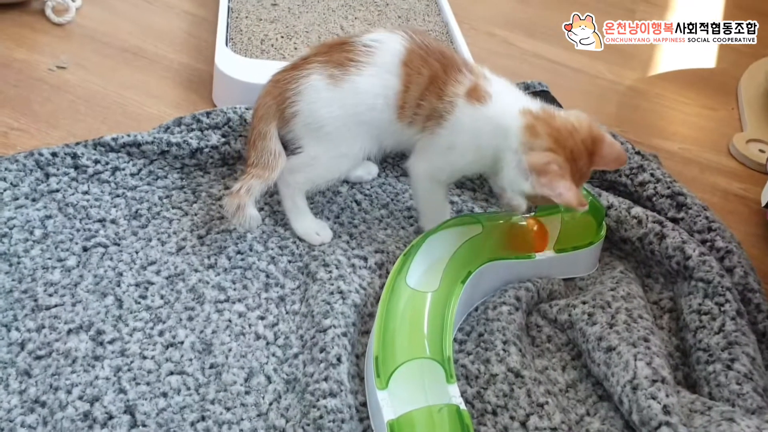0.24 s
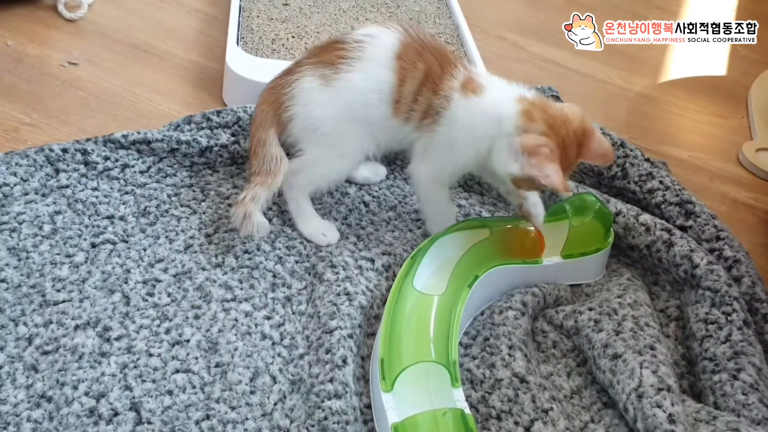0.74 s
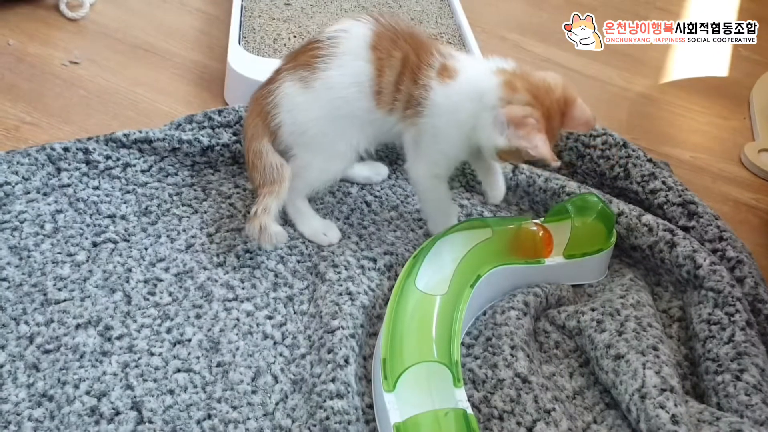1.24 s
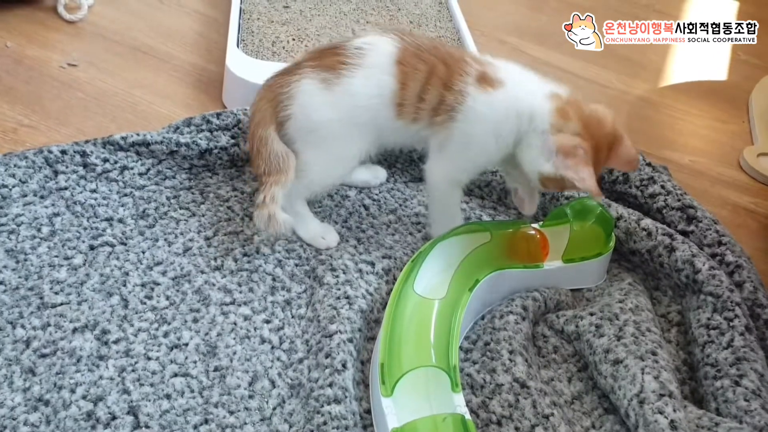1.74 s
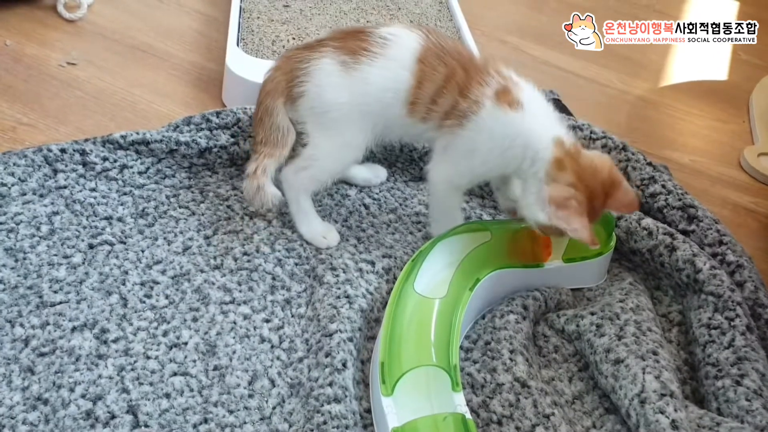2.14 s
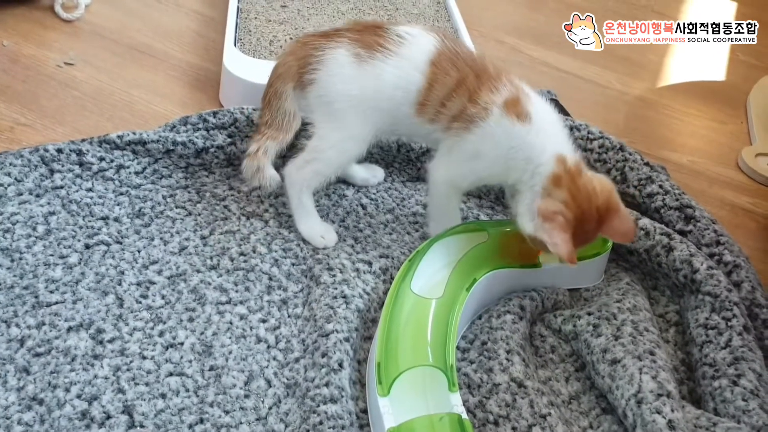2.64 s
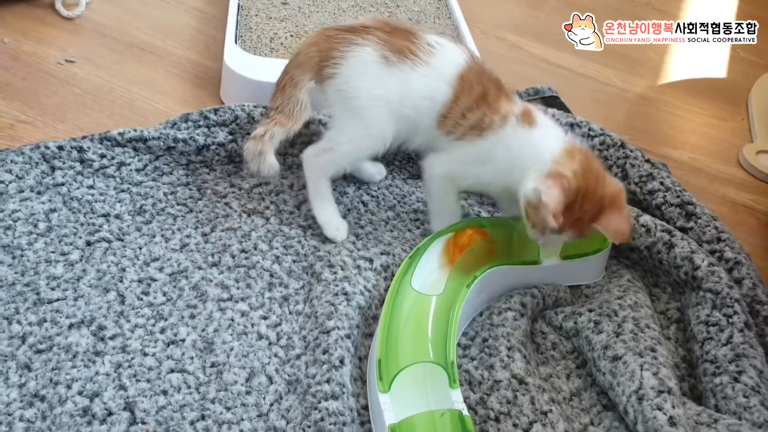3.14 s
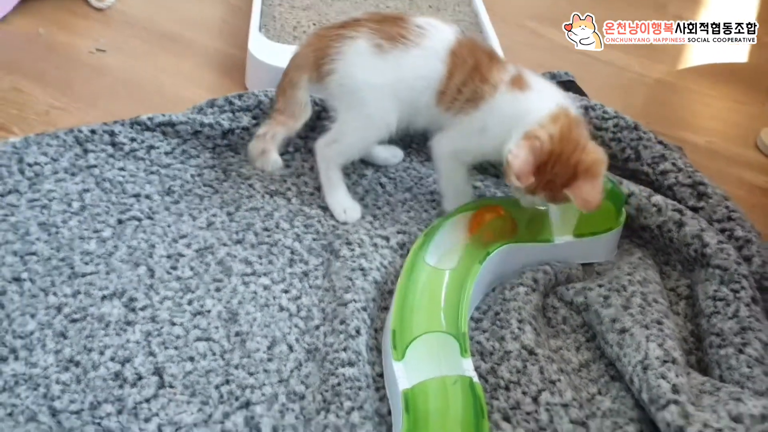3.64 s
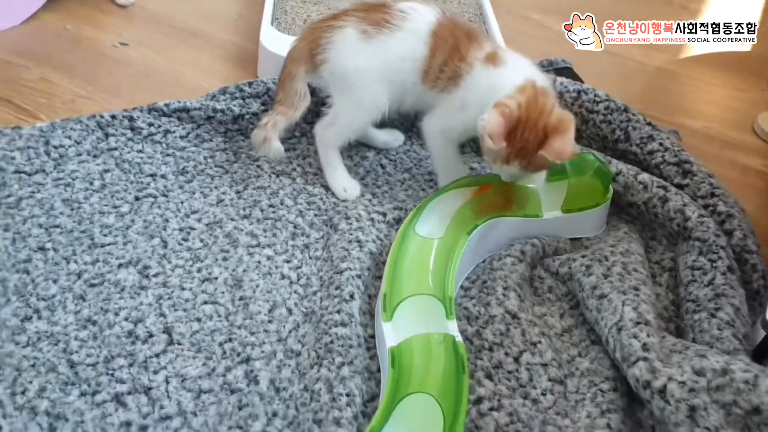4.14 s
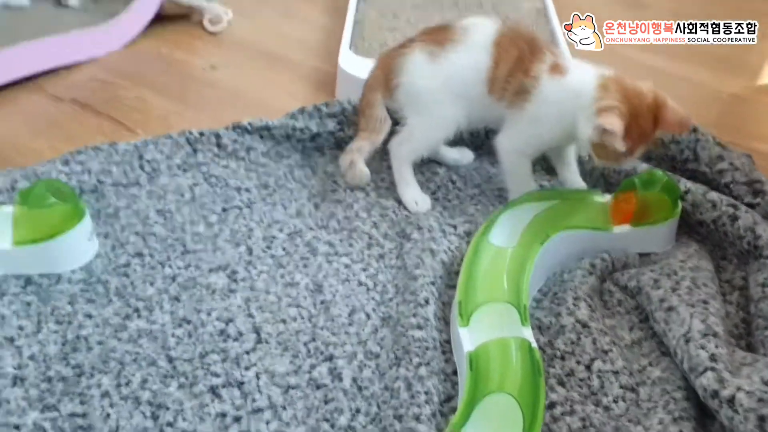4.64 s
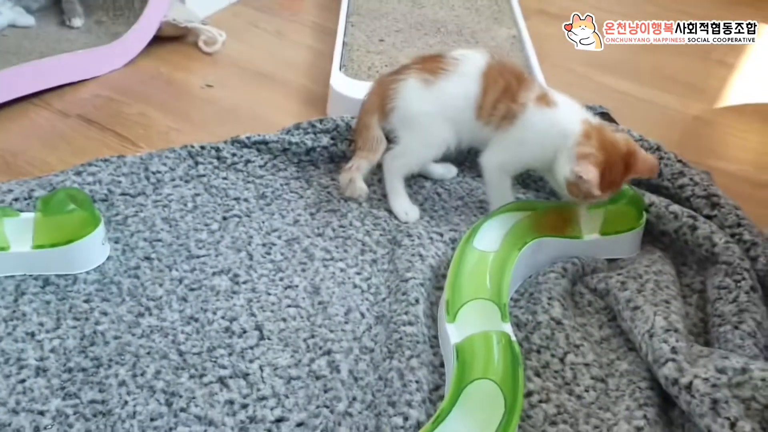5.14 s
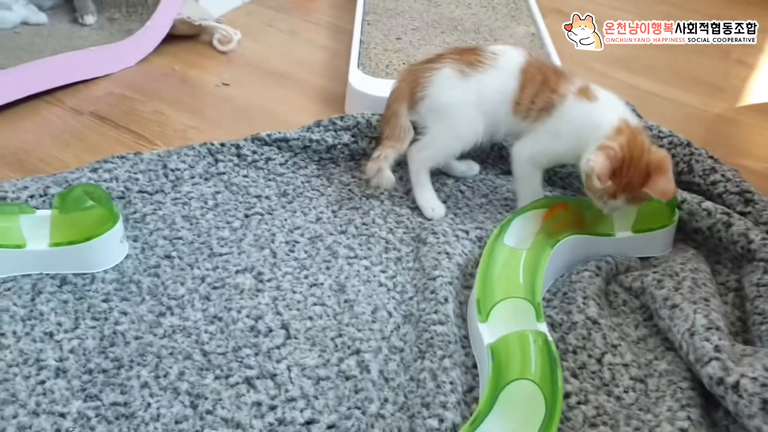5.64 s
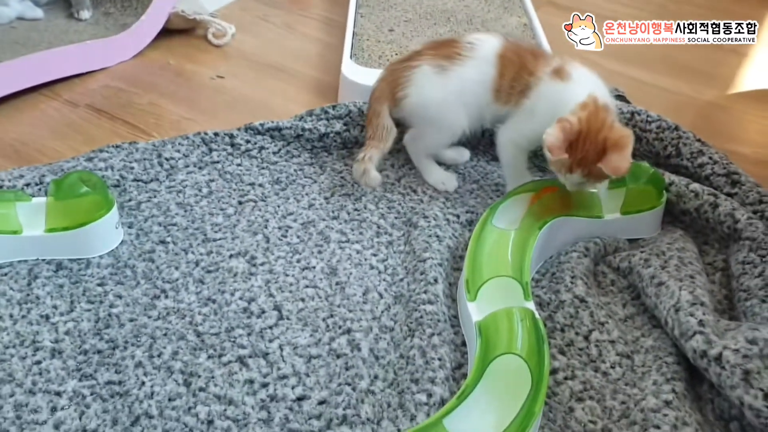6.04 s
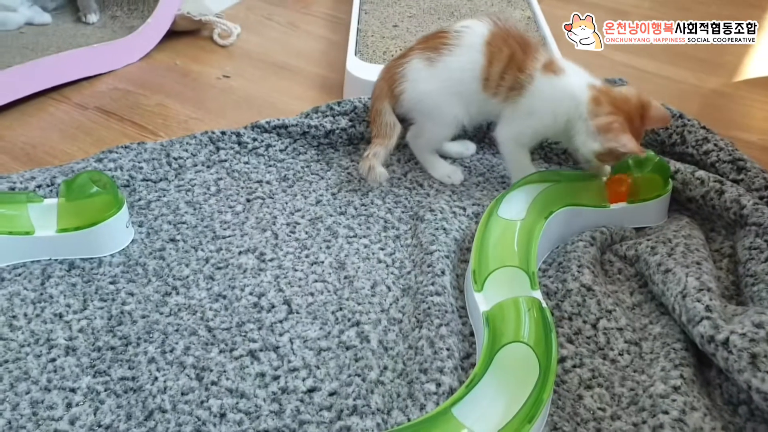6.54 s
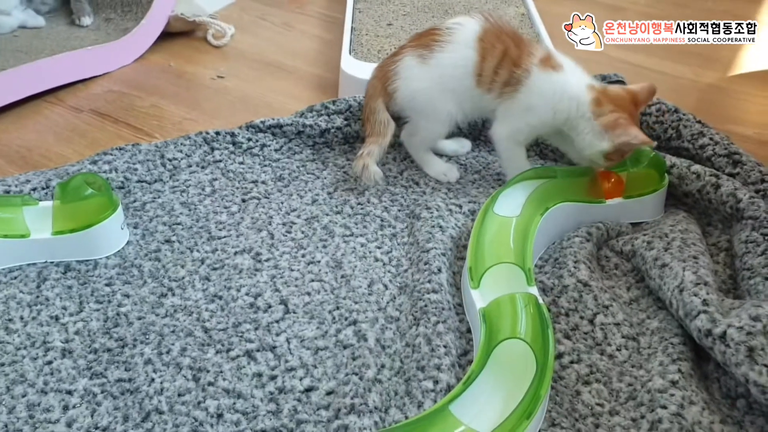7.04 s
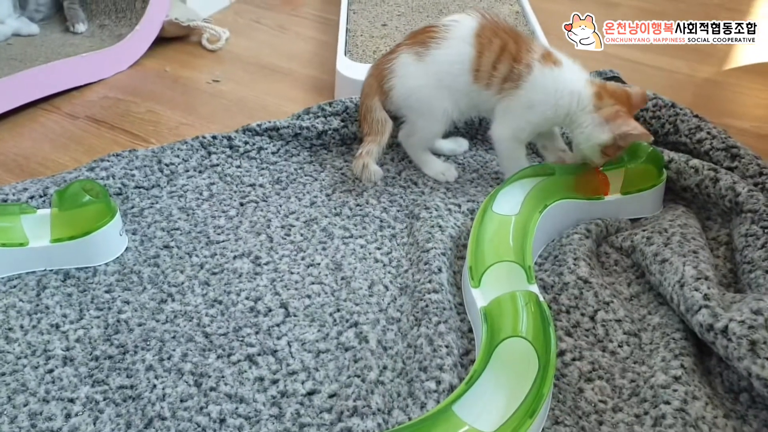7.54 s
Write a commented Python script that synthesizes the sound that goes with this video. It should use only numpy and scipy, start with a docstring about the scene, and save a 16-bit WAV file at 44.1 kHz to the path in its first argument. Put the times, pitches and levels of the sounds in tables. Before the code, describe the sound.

A kitten paws a ball in a hollow plastic track: hollow knocks, rattly rolling and claw ticks, with rubbing and bumps from the hand-held microphone.

```python
"""Kitten with a ball in a toy track

A kitten paws at a ball in a hollow plastic track in a quiet room: noise-like contact forces excite
the track's resonances as knocks, wall taps, rolling, claw ticks, scuffs and scrapes, with a reverberant tail.
Fingers on the hand-held recorder add rubbing (shaped noise), clicks and thumps (decaying pulses and tones),
and a bump on the right microphone (a damped pressure swing).
Filtered noise gives a low room rumble and an airy hiss, and wavering sines give a drone and a faint hum."""
import sys
import numpy as np
from scipy import signal
from scipy.fft import rfft, irfft
from scipy.io import wavfile
from scipy.ndimage import uniform_filter1d

SR = 44100
rng = np.random.default_rng(int(sys.argv[2]) if len(sys.argv) > 2 else 0)


def unload_audio(sound):
    """Save the sound as a 16-bit wav file, at the path given as the first command line argument."""
    columns = np.transpose(np.atleast_2d(sound))
    # keep every value between -1 and 1, then stretch to whole-number steps
    steps = np.round(np.clip(columns, -1, 1) * 32767)
    wavfile.write(sys.argv[1], SR, steps.astype(np.int16))


N = 343980
TIME = np.arange(N) / SR


def from_db(db):
    """Amplitude ratio from decibels, twenty per factor of ten."""
    return 10 ** (np.asarray(db) / 20)


def rms_one(x):
    """Normalise the mean power to one."""
    return x / np.sqrt(np.mean(x ** 2) + 1e-20)


def level(curve, column=1):
    """Amplitude envelope interpolated linearly in decibels, silent outside its span."""
    points = np.array(curve)
    return from_db(np.interp(TIME, points[:, 0], points[:, column], left=-200, right=-200))


def panned(db):
    """Stereo placement by interaural level difference: left and right gains."""
    difference = np.atleast_1d(db)
    return from_db(np.array([difference, -difference]) / 2)


def add(out, s, sound):
    """Linear superposition of a sound starting at s seconds."""
    i = max(int(s * SR), 0)
    out[..., i:i + sound.shape[-1]] += sound[..., :N - i]


def band(x, low_hz, high_hz, order=2):
    """Causal Butterworth band-pass filtering."""
    edges = [low_hz, min(high_hz, SR / 2 - 1000)]
    return signal.sosfilt(signal.butter(order, edges, "band", fs=SR, output="sos"), x)


def coloured(x, spectrum):
    """Spectral shaping: gains interpolated over log frequency; rms 1."""
    hz, db = np.transpose(spectrum)
    log_hz = np.log(np.fft.rfftfreq(x.shape[-1], 1 / SR) + 1)
    gain = from_db(np.interp(log_hz, np.log(hz), db, left=-90))
    return rms_one(irfft(rfft(x) * gain, x.shape[-1]))


def stereo_noise(alike, size=N):
    """Partly coherent white noise: a shared power fraction (alike) plus independent remainders."""
    shared = np.sqrt(alike) * rng.standard_normal(size)
    return shared + np.sqrt(1 - alike) * rng.standard_normal((2, size))


def wander(per_s, size=N):
    """Slow random modulation: normal draws joined by straight lines."""
    return np.interp(TIME[:size] * per_s, np.arange(1600), rng.standard_normal(1600))


def random_contacts(per_s, spread_db):
    """Poisson-like impulses whose sizes are exponentially distributed in decibels, capped at three spreads."""
    return (rng.random(N) < per_s / SR) * from_db(spread_db * np.minimum(rng.exponential(1, N), 3))


def grains(per_s, spread_db, hiss):
    """Asperity friction: random tiny contacts of uneven size over a smooth noise."""
    return rms_one(random_contacts(per_s, spread_db) * stereo_noise(0.095)) + hiss * stereo_noise(0.1)


def evened(x, window_s=0.062):
    """Short-time power normalisation: holds the rms near 1, leaving the fast grain."""
    power = uniform_filter1d(np.mean(x ** 2, axis=0), int(window_s * SR))
    return x / np.sqrt(np.maximum(power, 1e-20))


def strokes(rows, attack_s, release_db_per_s, swell_db=14):
    """Incoherent power addition of movements (start, length, dB) that swell, hold and decay exponentially."""
    power, t = 0, TIME[::40]
    for s, length, db in rows:
        swell = swell_db * np.maximum(1 - (t - s) / attack_s, 0)
        release = release_db_per_s * np.maximum(t - s - length, 0)
        power = power + from_db(np.maximum(db - swell - release, -200)) ** 2
    return np.interp(TIME, t, np.sqrt(power))


def stereo_strokes(rows, attack_s, release_db_per_s):
    """Stroke envelopes split by level difference; rows are (start, length, dB, left-right dB)."""
    return np.array([strokes([(s, length, db + side * pan / 2) for s, length, db, pan in rows],
                             attack_s, release_db_per_s) for side in (1, -1)])


def resonance(x, hz, width_hz):
    """One damped mode as a two-pole resonator, gain about 1 at its peak."""
    r, w = np.exp(-np.pi * width_hz / SR), 2 * np.pi * hz / SR
    return signal.lfilter(np.array([1, 0, -1]) * (1 - r * r) / 2, [1, -2 * r * np.cos(w), r * r], x)


def track(force, low_hz, high_hz, flex=0, shell_db=-15, coupling_db=4):
    """Modal synthesis: the plastic's modes, coupled unevenly as the contact moves, over a broad shell response."""
    # resonances of the plastic track, before coupling and flex: pitch_hz, width_hz, level_db
    track_modes = [(345, 220, -1), (458, 70, -9), (624, 55, -4.5), (729, 37, 2.5), (816.6, 26, 5),
                   (887, 7.1, -10.5), (961, 12.4, -7.5), (1380, 140, -18.5), (1550, 140, -10),
                   (2026, 190, -2), (2342, 105, 7), (2460, 70, -4.5), (2250, 140, -3.5), (2717, 40, -14),
                   (3356, 37, -7.5), (4300, 71, -1), (6570, 130, 1.5), (7090, 270, -1), (7190, 290, -8.5),
                   (8030, 74, -2), (8380, 97, -2.5), (10140, 74, 3), (11630, 170, 0), (12140, 720, -27)]
    out = from_db(shell_db) * force
    for hz, width, db in track_modes:
        if low_hz < hz < high_hz:
            coupling = coupling_db * wander(per_s=45, size=force.shape[-1])
            out = out + resonance(force * from_db(db + coupling), hz * (1 + flex * rng.normal()), width)
    return band(out, low_hz, high_hz, order=3)


def travelling(ring, glide):
    """Time-warp pitch shift: resonances glide a little as the contact moves along the track; rms near 1."""
    travel = TIME + np.cumsum(glide * wander(per_s=14)) / SR
    return evened(np.array([np.interp(travel % TIME[-1], TIME, side) for side in ring]))


def blow(low_hz, high_hz, contact_s, alike, buzz_db=-18, buzz_s=0.011, flex=0.021, rough=1.0):
    """Impact excitation: a rough contact and a buzz of the loose cover; each mode is detuned slightly at random."""
    t = TIME[:SR // 14]
    contact = (t / contact_s * np.exp(1 - t / contact_s)) ** 2
    buzz = from_db(buzz_db) * np.exp(-t / buzz_s) * (1 - np.exp(-t / contact_s))
    force = rough * stereo_noise(alike, size=len(t)) * (contact + buzz)
    if low_hz < 1000:   # the ball's mass drives the hollow in one push
        push = signal.unit_impulse(len(t), int(contact_s * SR))
        force = force + push * np.sqrt(np.sum(contact ** 2))
    ring = track(force, low_hz, high_hz, flex=flex)
    return ring / ring[:, :SR // 80].std()   # rms 1 over its start


def background(rumble_pan_db=-3, drone_hz=69, hum_hz=249):
    """Shaped noise of slowly changing level for rumble and hiss, phase-modulated sines for a drone and a late hum."""
    # noise levels of the room before panning: time_s, air_db, rumble_db
    room_levels = [(0, -62, -53), (1.1, -56, -48), (2.4, -56.5, -50.5), (3.3, -57.5, -44.5),
                   (4.5, -53, -43.5), (5.5, -57.5, -48.5), (6.3, -56, -47), (7.0, -61.5, -52.5),
                   (7.8, -58.5, -49)]
    # spectrum of the rumble: frequency_hz, relative_level_db
    rumble_colour = [(20, -17.5), (33, -12), (50, 6), (65, 6), (90, -5), (125, -5), (170, -16.5),
                     (260, -20.5), (400, -20), (800, -53)]
    # spectrum of the airy hiss: frequency_hz, relative_level_db
    air_colour = [(150, 15.5), (400, -2.5), (850, 7), (1300, 3), (2000, -5.5), (3000, -21), (5000, -25),
                  (10000, -27), (15500, -25)]
    # rms of the low drone before panning, swelling and fading: time_s, level_db
    drone_levels = [(0, -73), (.3, -48.5), (.8, -44.5), (1.1, -45.5), (1.5, -47.5), (2.1, -65)]
    # amplitude of the hum before panning: time_s, level_db
    hum_levels = [(4.6, -51.5), (5.0, -62), (5.4, -55.5), (5.9, -64.5), (6.6, -59.5), (7.1, -76.5),
                  (7.8, -60.5)]
    rumble = level(room_levels, column=2) * coloured(stereo_noise(0.88), rumble_colour)
    air = level(room_levels) * coloured(stereo_noise(0.14), air_colour)
    waver = coloured(rng.standard_normal(N), [(1.5, 12.0), (6, -11.5), (25, -63.0), (100, -120)])   # phase, rad
    drone = np.sqrt(2) * level(drone_levels) * np.sin(2 * np.pi * drone_hz * TIME + waver)
    hum = level(hum_levels) * np.sin(2 * np.pi * hum_hz * TIME + 0.39 * waver)
    return (rumble + drone + hum) * panned(rumble_pan_db) + air


def thumps(pan_db=-3, shudder_db=-12, attack_s=0.0027):
    """Damped low modes: soft blows ring through the case with an uneven narrow-band shudder."""
    # thumps through the case, levels before panning: start_s, level_db, pitch_hz, t60_s
    thump_rows = [(0.994, -32, 69.4, 1), (3.444, -33, 148.4, 0.077), (4.587, -10.5, 112, 0.057),
                  (4.611, -21, 135, 0.26), (4.626, -28, 108.8, 0.49), (5.887, -26.5, 117, 0.03)]
    out, t = np.zeros(N), TIME[:SR // 2]
    for s, db, hz, t60 in thump_rows:
        shudder = from_db(shudder_db) * rms_one(band(rng.standard_normal(len(t)), hz / 1.73, hz * 1.47))
        envelope = from_db(db - 60 * t / t60) * (1 - np.exp(-t / attack_s))
        add(out, s, envelope * (np.sin(2 * np.pi * hz * t) + shudder))
    return out * panned(pan_db)


def port_bump(swing_hz=68, swing_s=0.013, case_hz=235, case_db=-4, case_s=0.0024, snap_hz=1150, snap_db=-5,
              snap_s=0.0016, crackle_s=0.0063, slide_db=-35, slide_s=0.14):
    """Damped pressure oscillation: a fingertip shuts the right port, the case knocks, skin slides off with a hiss."""
    # fingertip on the right microphone, levels before filtering: start_s, step_db, crackle_db
    bump_rows = [(5.188, -16.5, -13.5), (5.191, -6, -17)]
    # spectrum of the fingertip's crackle and slide: frequency_hz, relative_level_db
    bump_colour = [(200, 10.5), (1200, -2), (3000, -1), (5000, -8.5), (7000, -5), (9000, -13.5),
                   (12500, -4), (15500, -13.5)]
    out, t = np.zeros((2, N)), TIME[:SR // 3]
    for s, step_db, crackle_db in bump_rows:
        swing = np.cos(2 * np.pi * swing_hz * t) * np.exp(-t / swing_s)
        case = from_db(case_db) * np.sin(2 * np.pi * case_hz * t) * np.exp(-t / case_s)
        snap = from_db(snap_db) * np.sin(2 * np.pi * snap_hz * t) * np.exp(-t / snap_s)
        step = from_db(step_db) * band(swing + case + snap, 27, 5500, order=1)
        crackle = coloured(rng.standard_normal(len(t)), bump_colour) * np.exp(-t / crackle_s)
        add(out[1], s, from_db(crackle_db) * crackle - step)
    slide = coloured(rng.standard_normal(len(t)), bump_colour) * np.exp(-(t / slide_s) ** 2)
    add(out[1], bump_rows[-1][0], from_db(slide_db) * band(slide, 1800, 24000, order=1))
    return out


def grip_clicks(thud_hz=190, thud_s=0.0012, creak_db=-19, creak_s=0.0041):
    """Impulse response of the case: a band-limited click, mostly at the left port, with a gritty creak and a thud."""
    # clicks of the case under the grip: start_s, click_peak_db, centre_hz, edge_over_centre, thud_db, right_db
    grip_rows = [(0.998, -46.5, 2520, 1.63, -31, 5), (3.253, -21, 2600, 1.4, -17.5, -30),
                 (3.274, -18, 2700, 1.4, -13.5, -26), (3.3, -10.5, 3620, 2.4, -14, -22),
                 (3.382, -12.5, 1860, 1.56, -9.5, -40), (3.409, -19, 1600, 2, -12.5, -40),
                 (3.645, -19, 3100, 2.55, -41, -30), (4.084, -13, 1830, 1.57, -30, -36),
                 (4.129, -20.5, 2200, 1.53, -47, -30), (4.3943, -13.5, 1960, 1.45, -44, -29),
                 (4.4005, -8, 3120, 2.5, -8.5, -30), (4.618, -13.5, 2580, 1.64, -26, -30),
                 (4.634, -20, 3300, 2.5, -41, -26), (5.495, -23.5, 2600, 1.5, -50, -29)]
    out, t = np.zeros((2, N)), TIME[:SR // 20]
    for s, db, hz, width, thud_db, right_db in grip_rows:
        click = band(signal.unit_impulse(len(t)), hz / width, hz * width, order=4)
        grit = rms_one(band(rng.standard_normal(len(t)), hz / 2.6, hz * 2.0))
        creak = from_db(creak_db) * grit * np.exp(-t / creak_s)
        thud = np.sin(2 * np.pi * thud_hz * t) * np.exp(-t / thud_s)
        sound = from_db(db) * (click / abs(click).max() + creak) + from_db(thud_db) * thud
        add(out, s, sound * from_db([[0], [right_db]]))
    return out


def shifting(x, depth_db):
    """Independent modulation of four adjacent bands, so the colour keeps changing."""
    out, edges_hz = 0, [125, 700, 2000, 5000, 16000]
    for k, (low, high) in enumerate(zip(edges_hz, edges_hz[1:])):
        polarity = (-1) ** k   # neighbouring bands take opposite signs
        out = out + polarity * band(x, low, high) * from_db(depth_db * wander(per_s=60))
    return out


def scratches(per_s=24, spread_db=-0.5, length_s=0.0064):
    """Stick-slip: skin catches and lets go in brief noise swells of varied size in six bands; rms near 1."""
    out, r = 0, np.exp(-1 / (length_s * SR))
    for hz in np.geomspace(1200, 9000, 6):
        starts = random_contacts(per_s, spread_db)
        swell = signal.lfilter([1], [1, -2 * r, r * r], starts + 1e-18)
        out = out + swell * rms_one(band(stereo_noise(0.12), hz / 1.35, hz * 1.5))
    return evened(out, window_s=0.26)


def rubbing(rub_db=-2, catch_db=-0.5, rasp_catch_db=4, flutter_db=0.8, scratch_db=-6):
    """Sliding friction: skin drags over the case with a fine grain, a coarse sticking rasp and small scratches."""
    # finger strokes on the case, levels before rub_db: start_s, length_s, level_db, rasp_share_db, left_right_db
    rub_rows = [(3.245, 0.058, -50.5, -4.5, 12), (3.373, .035, -46, -3, 17), (3.747, 0.2, -51, -15, 4.5),
                (4.042, 0.071, -53, 2, 13), (4.174, 0.095, -46.5, -3.5, 8.5), (4.257, 0.055, -44, -8, 4),
                (4.303, 0.042, -42.5, -7, 4.5), (4.367, 0.022, -35.5, -2.5, 9.5),
                (4.438, 0.029, -41.5, -8, 2.5), (4.475, 0.049, -45, -9, 3), (4.59, 0.027, -40, 0.5, 8.5),
                (4.667, 0.06, -44.5, -0.5, 5.5), (4.718, 0.057, -44, -6, 3),
                (4.786, 0.093, -45.5, -22, 2.5), (4.884, 0.072, -52.5, -10, 4),
                (5.016, 0.18, -53.5, -15, 5), (5.143, 0.17, -49, -7, -11)]
    # filter gains that colour the drag: frequency_hz, gain_db
    rub_colour = [(150, -17), (400, 4), (750, -0.5), (1100, -16.5), (1700, -8), (2450, -4.5), (3300, -11),
                  (5500, -12), (7500, -8.5), (12000, -11), (15500, -28.5)]
    attack_s, release_db_per_s = 0.029, 229
    drag_rows = [(s, length, db, pan) for s, length, db, _, pan in rub_rows]
    rasp_rows = [(s, length, db + share, pan) for s, length, db, share, pan in rub_rows]
    pressure = stereo_strokes(drag_rows, attack_s, release_db_per_s)
    sticking = stereo_strokes(rasp_rows, attack_s, release_db_per_s)
    grain = shifting(grains(per_s=700, spread_db=1.0, hiss=1.7), depth_db=3.0)
    drag = coloured(grain, rub_colour) * from_db(catch_db * wander(per_s=90))
    rasp = band(grains(per_s=350, spread_db=6.0, hiss=0.51), 800, 2400)
    rasp = rasp * from_db(rasp_catch_db * wander(per_s=110))
    skin = pressure * (evened(drag) + from_db(scratch_db) * scratches()) + sticking * evened(rasp)
    return from_db(rub_db + flutter_db * wander(per_s=31)) * skin


def room(x, wet_db=-7, t60_s=0.27, treble_t60_s=0.23):
    """Diffuse reverberation: convolution with decaying noise that loses its treble first."""
    t = TIME[:SR // 2]
    noise = rng.standard_normal((2, len(t))) * (t > .005)   # a gap ahead of the tail
    tail = band(noise, 150, 7500) * from_db(-60 * t / t60_s)
    tail = tail + band(noise, 6900, 24000) * from_db(-60 * t / treble_t60_s)
    tail /= np.sqrt(np.sum(tail ** 2, axis=1, keepdims=True))
    return x + from_db(wet_db) * signal.fftconvolve(x, tail, axes=1)[:, :N]


def scraping(slip_db=6.0, glide=0.044):
    """Stick-slip: the loose cover drags on its base, and uneven dry contacts rattle its middle modes."""
    # drags of the cover against its base: start_s, length_s, level_db, left_right_db
    scrape_rows = [(0.01, 0.099, -66, 3), (.135, .05, -56, -6), (.185, 0.025, -56.5, 2),
                   (.235, 0.037, -60, 2), (.715, 0.089, -61, 2), (.815, 0.086, -71, 3),
                   (2.805, .08, -63.5, 5), (2.9, .035, -52, 3), (3.25, 0.068, -48.5, 6),
                   (3.308, 0.039, -49.5, 4.5), (3.408, 0.03, -42, 10.5), (3.465, 0.039, -50, 6.5),
                   (5.655, 0.021, -69, 2), (5.98, 0.11, -65, 1), (6.17, 0.078, -64, 0),
                   (6.325, 0.026, -51.5, 2), (6.39, 0.07, -65.5, 2.5), (6.49, 0.036, -57, 6.5),
                   (6.56, 0.077, -61, 1)]
    force = grains(per_s=450, spread_db=5.5, hiss=0.57) * from_db(slip_db * wander(per_s=120))
    rattle = travelling(track(force, 2900, 6800, shell_db=-7.5, coupling_db=10.5), glide)
    return stereo_strokes(scrape_rows, attack_s=0.013, release_db_per_s=333) * rattle


def scuffing(scuff_db=-2, pan_db=3, catch_db=2.0, glide=0.02):
    """Friction-driven resonance: fur and claws catch on the cover and excite its high modes."""
    # paw strokes on the cover, levels before scuff_db and panning: start_s, length_s, level_db
    scuff_rows = [(0, 0.025, -53.5), (.15, 0.082, -54), (.675, 0.048, -59.5), (.72, 0.046, -56.5),
                  (.81, 0.2, -68), (2.62, 0.015, -57.5), (2.8, 0.09, -54.5), (2.88, 0.014, -43.5),
                  (3.02, 0.021, -56), (3.16, 0.11, -61), (3.255, 0.17, -48), (3.405, 0.032, -37.5),
                  (3.66, 0.019, -52.5), (5.32, 0.075, -46.5), (5.66, 0.11, -57.5), (6.11, 0.13, -49.5),
                  (6.32, 0.043, -46.5), (6.41, 0.21, -60), (7.38, 0.018, -70), (7.6, 0.018, -65.5)]
    force = grains(per_s=1100, spread_db=2.0, hiss=0.885) * from_db(catch_db * wander(per_s=90))
    ring = travelling(track(force, 3300, 14300, shell_db=-11, coupling_db=5.5), glide)
    stroke = strokes(scuff_rows, attack_s=0.012, release_db_per_s=154)
    return from_db(scuff_db) * stroke * ring * panned(pan_db)


def claws(wall_db=-13, pan_share=0.66, spread=1.3):
    """Selective modal excitation: a skidding claw rings high modes near its own pitch, with a faint wall clack."""
    # claw skids, and at 3.296 s a bright hiss that goes with the case click on the left; # pan before
    # pan_share: start_s, level_db, contact_s, centre_hz, left_right_db
    claw_rows = [(0.002, -49.5, 0.0018, 3630, -5), (0.166, -65, 0.0036, 6500, 4),
                 (0.181, -50, .0025, 5900, 10), (0.226, -70, 0.0042, 8200, 1),
                 (0.239, -53, 0.0031, 9150, 7), (0.275, -63, 0.0065, 5800, 4),
                 (0.767, -50, 0.0022, 9500, 12), (0.752, -68, .006, 5000, 6), (0.822, -66, .004, 5600, 16),
                 (0.868, -59.5, 0.0023, 5500, 15), (0.93, -65, 0.0026, 6170, 11),
                 (2.892, -44, 0.0013, 3970, -5), (2.905, -49, .002, 3900, 3), (2.912, -57, 0.0036, 5600, 2),
                 (2.957, -56, .003, 5500, 4), (3.027, -55, 0.0027, 6360, 2), (3.046, -54, 0.0036, 6400, 9),
                 (3.296, -40, 0.002, 8400, 24), (3.313, -41, 0.0019, 6600, 13),
                 (3.333, -47, 0.0033, 7500, 3.5), (3.413, -33.5, 0.0036, 7100, 18.5),
                 (3.443, -31, 0.0026, 6300, 15.5), (3.446, -38.5, 0.0024, 11440, 2),
                 (3.465, -36, 0.0024, 6490, 11.5), (3.859, -44.5, 0.0026, 8000, 15),
                 (4.193, -46.5, 0.0012, 8200, 19), (4.324, -47.5, 0.002, 9030, 15),
                 (4.675, -47, 0.0033, 8800, 13), (4.924, -45, 0.0023, 9100, 6.5),
                 (5.056, -49.5, 0.0028, 8000, 18), (6.124, -49, 0.0022, 7300, 13),
                 (6.176, -42.5, 0.01, 8890, 5), (6.2, -44.5, 0.0099, 10850, -4),
                 (6.327, -49.5, 0.0026, 6200, 16), (6.357, -57, .003, 9000, 5),
                 (6.402, -52, 0.0014, 8450, 4), (6.459, -57, 0.0023, 7530, 3),
                 (6.497, -59, 0.0041, 8270, 5), (6.517, -60, 0.0029, 7320, 5),
                 (6.613, -58, 0.0034, 9000, -3), (6.736, -59, 0.0019, 8500, 1),
                 (7.402, -65, 0.0029, 6500, 6), (7.61, -73, 0.0054, 6940, 6)]
    out = np.zeros((2, N))
    for s, db, contact_s, hz, pan in claw_rows:
        tick = blow(hz / spread, hz * spread, contact_s, alike=0.13)
        wall = from_db(wall_db) * blow(1800, 4100, contact_s, alike=0.17)
        add(out, s, from_db(db) * (tick + wall) * panned(pan_share * pan))
    return out


def rolling(hollow_db=-4, chatter_db=-3, pan_db=3, clatter_db=3.5, glide=.05):
    """Rolling as dense micro-impacts: the hollow booms and the walls chatter, their pitch shifting with travel."""
    # runs of the ball, before hollow_db and chatter_db: start_s, length_s, hollow_level_db, chatter_level_db
    roll_rows = [(0, 0.057, -58, -47.5), (0.109, 0.17, -50.5, -53.5), (0.33, 0.058, -76, -66),
                 (0.51, 0.33, -68, -70), (0.707, 0.067, -49.5, -54.5), (2.598, 0.065, -52, -52.5),
                 (2.794, 0.14, -44, -47), (2.87, 0.037, -36.5, -50), (3.003, 0.071, -54.5, -52),
                 (3.141, 0.15, -43.5, -50), (3.233, 0.18, -44.5, -46), (3.432, 0.011, -31, -43.5),
                 (3.653, 0.038, -52, -52), (5.327, 0.051, -42.5, -41.5), (5.637, 0.054, -57, -56),
                 (5.862, 0.023, -50, -50.5), (6.03, 0.25, -50, -55.5), (6.285, 0.32, -56, -55.5),
                 (7.377, 0.021, -58.5, -61.5), (7.579, 0.021, -54, -60)]
    attack_s, release_db_per_s = 0.02, 218
    force = grains(per_s=800, spread_db=4.0, hiss=0.6) * from_db(clatter_db * wander(per_s=130))
    hollow = travelling(track(force, 250, 1400, shell_db=-10.5), glide / 2)
    chatter = travelling(track(force, 970, 3530, shell_db=-9.5, coupling_db=7.5), glide)
    boom_rows = [(s, length, db + hollow_db) for s, length, db, _ in roll_rows]
    rattle_rows = [(s, length, db + chatter_db) for s, length, _, db in roll_rows]
    boom = strokes(boom_rows, attack_s, release_db_per_s)
    rattle = strokes(rattle_rows, attack_s, release_db_per_s)
    return boom * hollow + rattle * chatter * panned(pan_db)


def taps(tap_db=1, contact_s=0.0016, top_db=-23, body_db=-15, pan_share=0.79, flex=0.021, buzz_db=-15, buzz_s=0.018):
    """Mode participation: a grazing contact rings and buzzes a side wall, its position weighting the modes."""
    # grazes, before tap_db, flex and pan_share: start_s, level_db, main_hz, lower_db, upper_db, left_right_db
    tap_rows = [(0.008, -43, 2340, -10, -15, 3), (0.021, -44, 2360, -2, -4, 6),
                (0.040, -56, 2480, -9, -10, 1), (0.0865, -48, 2340, -4, -12, 5),
                (0.120, -51, 2360, -1, -10, 2), (0.1457, -47, 2200, 4, -10, 5),
                (0.171, -42, 2270, 0, -10, 0), (0.330, -56, 2270, -4, -14, 5),
                (0.357, -54, 2480, -12, -18, 1), (0.378, -58, 2500, -17, -21, 5),
                (0.514, -59, 2550, -17, -24, 8), (0.535, -65, 2460, -14, -21, 3),
                (0.635, -56, 2470, -7, -18, 11), (2.960, -43, 2480, -11, -4, 3),
                (3.026, -34, 2280, -9, -1, 3), (3.048, -45, 2380, -16, 8, 3), (3.165, -51, 2460, -4, 4, 14),
                (3.230, -48, 2260, -11, 4, 8), (3.314, -35, 2230, -8, 0.5, 11),
                (3.335, -36, 2440, -2, -1, 8), (3.420, -42, 2400, -2, 4, 5), (3.445, -32, 2260, -1, 2, 6),
                (3.487, -41, 2440, -12, -4, 9), (4.196, -44, 2350, -11, -11, 14),
                (4.261, -40.5, 2430, -14, -7, 11), (4.313, -39, 2450, 0, -9, 10),
                (4.675, -46, 2300, 2, -5, 2), (4.703, -37.5, 2260, 2, -9, 15), (4.729, -37, 2250, 5, -5, 9),
                (4.755, -42, 2380, 1, -3, 11), (4.888, -44, 2420, 0, 6, 13), (4.917, -42, 2380, -5, -2, 12),
                (4.956, -40, 2400, -10, -21, 15), (5.036, -44, 2400, -3, -14, 15),
                (5.057, -38, 2320, -4.5, -3, 10), (5.078, -54, 2370, 3, -4, 5),
                (5.112, -47, 2400, 0, -4, 9), (5.129, -50, 2400, -1, 2, 11),
                (5.315, -31.5, 2356, -11, -21, 4), (5.349, -39, 2300, -4, -15, 5),
                (5.372, -40, 2370, -3, -16, 5), (5.393, -45, 2300, -5, -10, 5),
                (5.626, -57, 2370, -8, -16, 11), (5.681, -49, 2380, -8, -9, 7),
                (5.703, -49, 2410, -9, -12, 2), (5.743, -44.5, 2320, -8, -18, 6),
                (5.755, -50, 2380, -12, -16, 8), (6.015, -50, 2380, -9, -17, 11),
                (6.043, -48, 2400, -14, -18, 11), (6.074, -47.5, 2380, -19, -27, 19),
                (6.102, -40, 2400, -11, -21, 11), (6.122, -37.5, 2300, -15, -28, 20),
                (6.144, -49, 2380, -7, -19, 4), (6.180, -41.5, 2400, 11, -12, 4),
                (6.216, -39.5, 2330, 13, -17, 8), (6.242, -41.5, 2360, -4, -14, 8),
                (6.334, -43, 2500, -1, -8, 9), (6.360, -36.5, 2380, -8, -18, 3.5),
                (6.402, -40.5, 2310, -6, -22, 7), (6.428, -40.5, 2340, -12, -21, 9),
                (6.456, -43, 2310, -9, -17, 5), (6.516, -55, 2360, -12, -7, 0),
                (6.563, -43, 2330, -7, -15, 8), (6.585, -56, 2400, -8, -2, 1)]
    # lower, main, upper and top wall modes, each filtered twice: multiple_of_main, filter_width_hz
    wall_modes = [(.7, 519), (0.999, 229.3), (1.2, 240), (1.82, 499)]
    out, t = np.zeros((2, N)), TIME[:SR // 20]
    contact = t / contact_s * np.exp(1 - t / contact_s)
    buzz = from_db(buzz_db) * np.exp(-t / buzz_s) * (1 - np.exp(-t / contact_s))
    for s, db, main_hz, lower_db, upper_db, pan in tap_rows:
        force = stereo_noise(0.23, size=len(t)) * (contact + buzz)
        ring = from_db(body_db) * rms_one(band(force, 400, 880))
        for (multiple, width), mode_db in zip(wall_modes, (lower_db, 0, upper_db, top_db)):
            hz = main_hz * multiple * (1 + flex * rng.normal())
            ring = ring + from_db(mode_db) * rms_one(resonance(resonance(force, hz, width), hz, width))
        ring = ring / abs(ring.mean(axis=0)).max()
        add(out, s, from_db(db + tap_db) * ring * panned(pan_share * pan))
    return out


def knocks(hollow_db=1, wall_db=-17, cover_db=-9, bright_db=-29, pan_share=0.3, hollow_pan_share=0.237,
           rebound_s=.022, rebounds=2):
    """Impact and restitution: the ball booms, clacks and rings the cover, then rebounds ever more weakly."""
    # strikes on the track, before the voices' levels and pan shares:
    # start_s, level_db, hollow_share_db, clack_share_db, loss_per_rebound_db, left_right_db
    knock_rows = [(0.004, -32.5, -24, -22, 7, 10), (0.141, -46.5, -10, -7, 12, 6),
                  (0.274, -41, -5.5, -9.5, 16, 4), (0.713, -41, -5.5, -6, 12, 15),
                  (0.717, -45, -6.5, -9.5, 16, 11), (0.871, -49.5, -14, -3, 28, 8),
                  (2.619, -47.5, -2, -6, 6.5, 19), (2.812, -33.5, -39, -16, 17, 14),
                  (2.891, -24, -5.5, -17, 12, 2), (2.913, -34.5, -12, -12, 13, 4),
                  (3.395, -24.5, -22, -18, 3, 18), (3.444, -19, -10.5, -16.5, 14, 18),
                  (3.676, -31.5, -26, -22, 30, 35), (4.06, -30.5, -40, -33.5, 1.5, 38),
                  (5.349, -32, -6.5, -27, 1.5, 6), (5.745, -35, -15, -36, 11, 7),
                  (5.89, -37, -7, -33, 19, -15), (6.035, -39, -7.5, -19, 20, 20),
                  (6.072, -32.5, -15.5, -31, 3.5, 27), (6.217, -45, -12, -6, 14, 6),
                  (6.403, -52, -16, -7, 8, 5)]
    out = np.zeros((2, N))
    for s, first_db, hollow_share, clack_share, loss_db, pan in knock_rows:
        for k in range(rebounds + 1):
            db = first_db - k * loss_db
            if db < -56:   # too faint to hear
                break
            hollow = from_db(hollow_share + hollow_db) * blow(380, 1400, contact_s=0.00137, alike=0.72)
            wall = from_db(wall_db) * blow(1400, 2400, contact_s=0.0019, alike=0.14)
            # the shell's dull, broad answer
            clack = from_db(clack_share) * blow(1050, 2050, contact_s=0.00153, alike=0.14)
            # hard blows reach higher
            hardness_db = db + 19.5
            cover_gain = from_db(hollow_share + cover_db + hardness_db)
            cover = cover_gain * blow(3700, 5400, contact_s=0.0006, alike=0.36)
            bright = from_db(bright_db) * blow(3000, 11000, contact_s=0.0022, alike=0.21)
            shell = (wall + clack + cover + bright) * panned(pan_share * pan)
            add(out, s + k * rebound_s, from_db(db) * (hollow * panned(hollow_pan_share * pan) + shell))
    return out


def scene():
    """Superposition of direct and reverberant paths: the toy sounds in the room, handling reaches the microphones."""
    toy = room(knocks() + taps() + claws() + rolling() + scuffing() + scraping())
    return toy + rubbing() + grip_clicks() + port_bump() + thumps() + background()


def record(dry, cutoff_hz=15800):
    """Amplitude clipping at full scale, then a steep elliptic low-pass."""
    lowpass = signal.ellip(10, .1, 80, cutoff_hz, fs=SR, output="sos")
    return signal.sosfilt(lowpass, np.clip(dry, -1, 1))


dry = scene()
out = record(dry)
unload_audio(out)
```